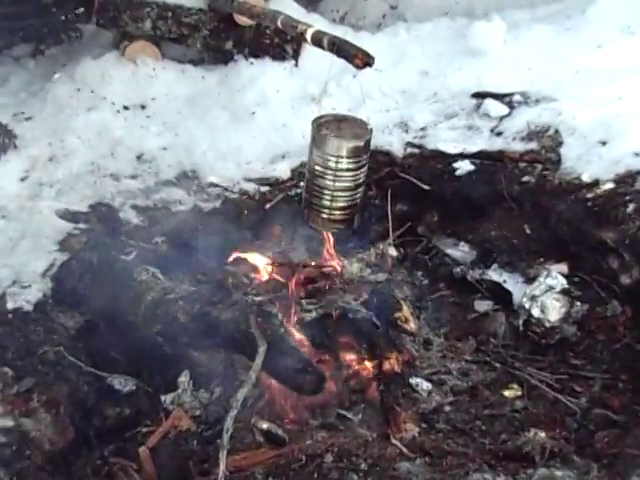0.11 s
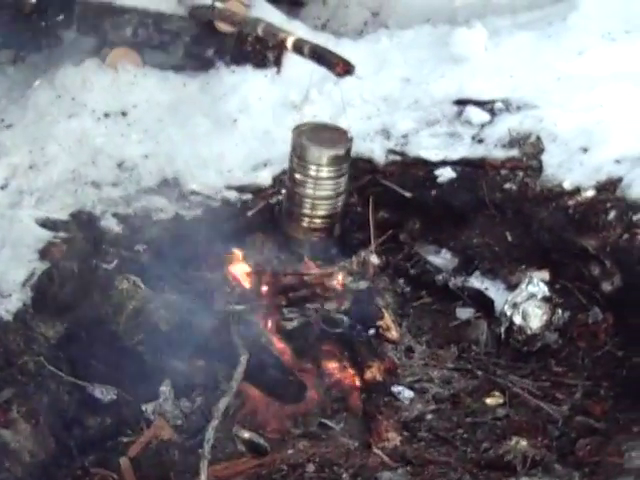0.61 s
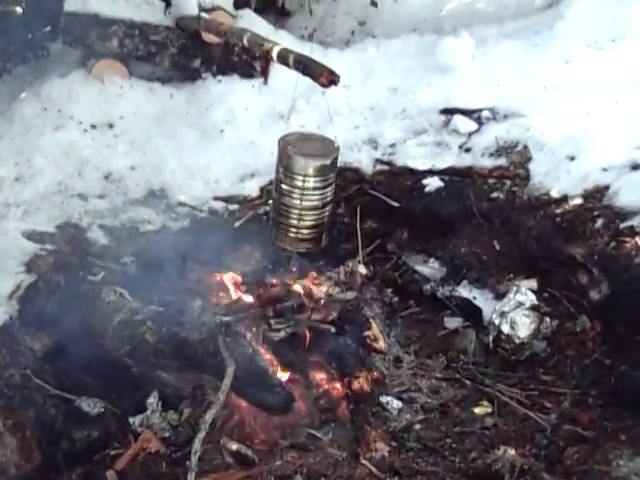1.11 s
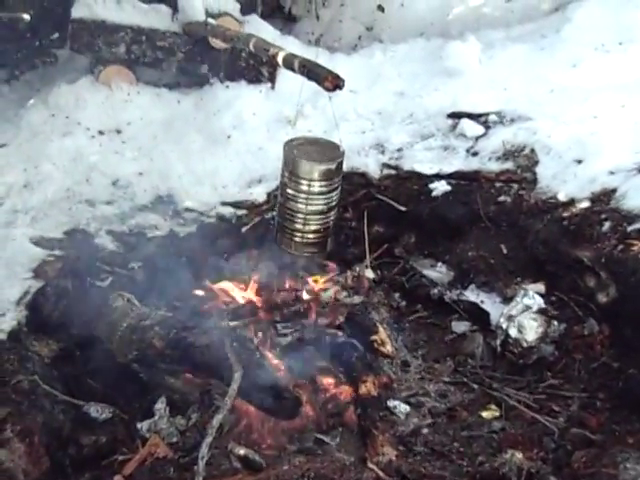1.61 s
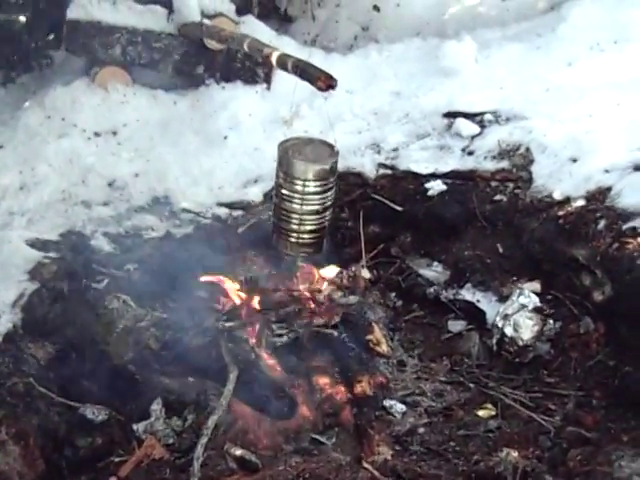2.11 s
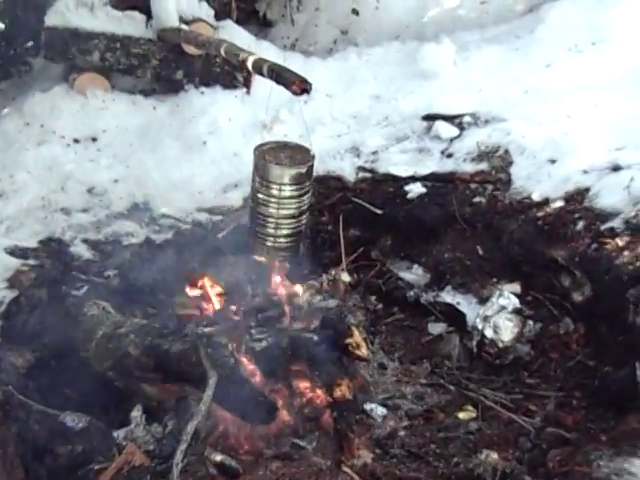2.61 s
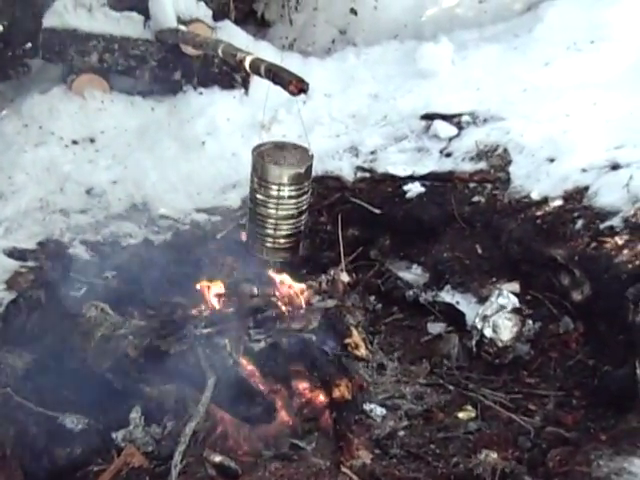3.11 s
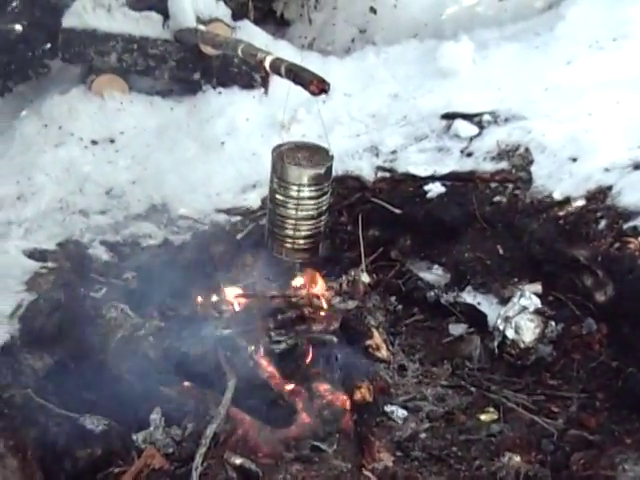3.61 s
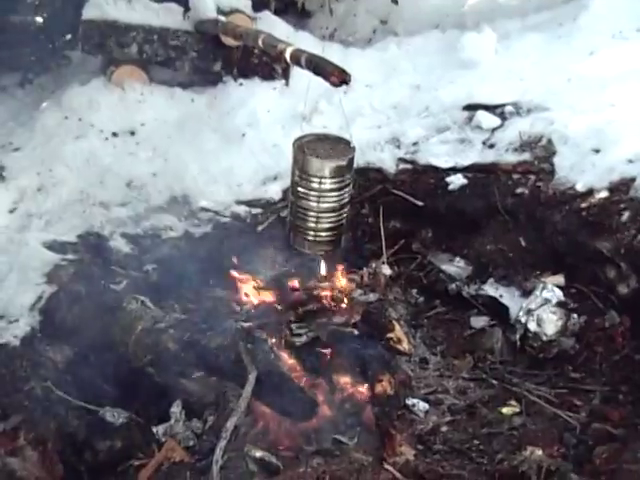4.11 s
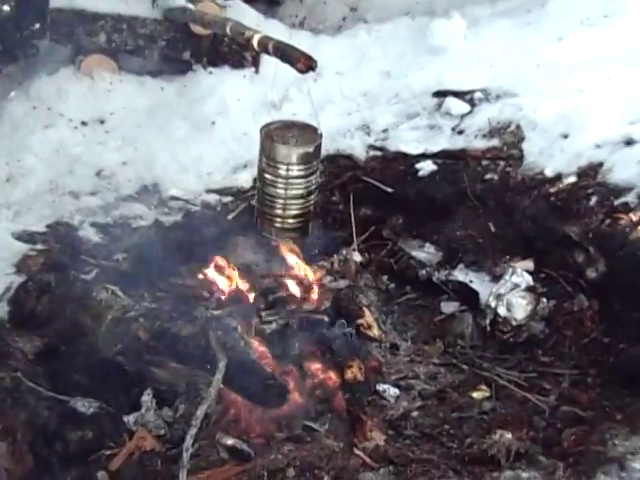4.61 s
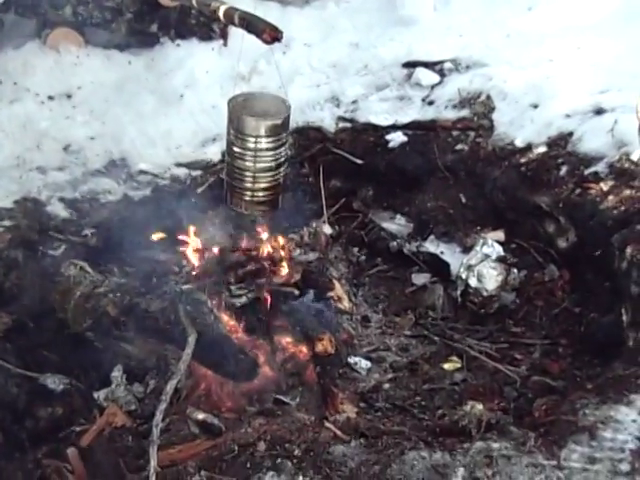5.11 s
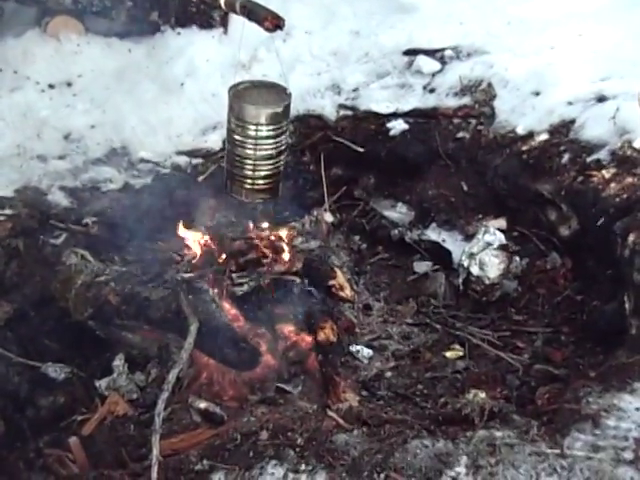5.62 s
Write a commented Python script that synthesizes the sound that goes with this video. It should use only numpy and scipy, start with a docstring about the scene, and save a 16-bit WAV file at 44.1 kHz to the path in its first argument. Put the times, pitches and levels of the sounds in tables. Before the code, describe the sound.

Close campfire crackle outdoors: dry bright snaps and clusters of pops with little steam hisses, above a quiet airy flame rustle.

```python
"""A small wood fire roars and hisses softly throughout, with sharp pops from the start, in the snow by a camera.
Pockets of sap burst as clusters of micro-cracks, each followed by a gritty spray of escaping steam.
Gas jets hiss, puffs and one low rustle swell and fade, gliding breathy tones whistle, bark snaps faintly.
The roar is coloured noise; the hand-held camera adds a faint hum, thin whines and short motor blips, all sines."""
import sys
import numpy as np
from scipy import signal
from scipy.io import wavfile

SR = 44100
rng = np.random.default_rng(int(sys.argv[2]) if len(sys.argv) > 2 else 0)


def dump_mix(stems):
    """Bounce the given channels to the path in sys.argv[1] as a 16-bit WAV at rate SR."""
    frames = np.atleast_2d(stems).T  # one column per channel
    limited = np.clip(frames, -1, 1)  # hard clip at full scale
    pcm = np.round(limited * 32767).astype(np.int16)
    wavfile.write(sys.argv[1], SR, pcm)


def level_to_linear(level):
    """Convert decibel levels to linear amplitude factors, elementwise."""
    exponent = np.asarray(level, float) / 20
    return 10 ** exponent


N = 252693  # samples in the scene

# All levels below are source levels, ahead of the trim and filters in record().
# Bursting sap pockets: start_s, low_db, mid_db, high_db, spray_db (steam)
POPS = [(.078, -61.5, -51, -21.5, -32.5), (0.085, -66, -54, -47, -50), (0.1005, -70, -66.5, -42.5, -46.5),
        (0.1275, -54, -47, -42, -60), (0.1342, -53, -43, -44.5, -46), (.1406, -65, -57.5, -41, -46),
        (0.1845, -35.5, -60, -36, -33), (.1903, -68, -46, -29.5, -54), (0.1971, -70, -34, -34.5, -55),
        (.291, -51.5, -43, -36.5, -46), (.3511, -42.5, -40, -31.5, -51), (0.3562, -24.5, -31.5, -14, -19.5),
        (.3611, -57, -20, -39.5, -45), (0.388, -40, -32.5, -51, -49), (.5802, -55, -63, -40.5, -60),
        (0.628, -29, -34.5, -27, -38), (.82, -39, -56, -33.5, -42.5), (0.9322, -58, -45.5, -31.5, -60),
        (.9729, -51, -70, -41, -60), (1.044, -46, -76.5, -42, -41), (1.102, -38.5, -35, -37, -39.5),
        (1.4481, -52, -38, -36.5, -60), (1.49, -61, -60, -39.5, -59), (1.5155, -39, -29.5, -36, -37),
        (1.8582, -45, -41, -54.5, -43), (1.8648, -46, -56, -31, -42), (1.8793, -47, -56.5, -39, -58),
        (1.9088, -53, -65, -43, -50), (1.9431, -37.5, -77, -50, -40), (1.9786, -65, -62, -36, -60),
        (2.1026, -44.5, -70, -38, -41.5), (2.211, -37.5, -47, -39, -37), (2.2233, -38, -38.5, -37, -40.5),
        (2.374, -47, -47, -60, -60), (2.6552, -41, -34.5, -29, -43.5), (2.8237, -51.5, -67, -38, -60),
        (2.8471, -51, -62, -46, -46), (3.0968, -49, -45, -44.5, -60), (3.2633, -17.5, -14, -4, -33),
        (3.349, -58, -67, -43, -60), (3.4458, -73, -39.5, -41.5, -40.5), (3.5198, -64, -40.5, -48, -60),
        (3.5759, -42.5, -62, -49, -43), (3.6118, -46, -53, -35.5, -58), (3.6579, -24.5, -7.5, -12.5, -19.5),
        (3.6684, -31, -33, -32, -50), (3.6827, -47, -44.5, -31, -50), (3.819, -70, -49, -41, -60),
        (3.883, -69, -38.5, -34, -40), (3.8903, -64.5, -63, -24.5, -32), (3.903, -64, -68, -39, -40),
        (3.9259, -66, -35, -21, -33.5), (3.973, -27.5, -62.5, -21.5, -27.5), (3.988, -66, -38, -45, -47),
        (3.9922, -60, -51.5, -32, -45), (4.0672, -43, -65.5, -39, -54), (4.0879, -53.5, -43, -36.5, -40.5),
        (4.287, -50.5, -73, -35.5, -60), (4.5061, -50.5, -64.5, -44, -60), (4.5653, -73, -72, -41.5, -43),
        (4.6294, -32.5, -32, -23.5, -31.5), (4.7418, -70, -71, -44, -58), (4.769, -62.5, -58, -43, -41),
        (4.7968, -50, -67, -49, -40), (4.8145, -38.5, -59, -41, -35), (4.8554, -70, -63, -41, -60),
        (4.9335, -45, -54, -36, -50), (4.9358, -73, -45, -29, -36), (5.0575, -66, -75.5, -35, -60),
        (5.1181, -55.5, -63, -35.5, -60), (5.1579, -39.5, -48.5, -25, -39), (5.1733, -43, -41, -41, -57.5),
        (5.215, -39.5, -43, -32, -39), (5.417, -34, -40, -27.5, -31.5), (5.4214, -36, -24, -17.5, -35),
        (5.5579, -36, -41, -54, -37), (5.6264, -29.5, -19, -18, -33), (5.653, -65, -47.5, -40, -60)]
# Bands of a pop, from low and mid to high and air: low_hz, high_hz
POP_BANDS = [(900, 2400), (2500, 5100), (6700, 11000), (11000, 15000)]
# Polarity of each band, so that neighbours join without a notch: sign
BAND_SIGNS = (1, -1, 1, -1)
# Strength of the fire, joined by straight lines: time_s, roar_db, jet_db
FIRE = [(0.0, -50.5, -51), (.48, -51, -55), (1.13, -50.5, -52), (1.37, -53.5, -50), (1.53, -53.5, -56.5),
        (1.85, -53, -55), (2.08, -49.5, -54), (2.86, -56, -56.5), (3.08, -53, -51), (3.27, -51, -45),
        (3.51, -53, -53), (3.69, -52.5, -51), (3.86, -56.5, -50), (3.97, -55, -43), (4.17, -53, -54.5),
        (4.72, -56.5, -53), (5.17, -55, -55), (5.73, -54, -53.5)]
# Relative colour of the flame roar: frequency_hz, density_db (per Hz)
ROAR_COLOUR = [(18, -31), (30, -13), (197, -0.5), (359, 0.5), (781, 2), (834, 2.5), (1240, -1),
               (1850, -2.5), (4030, -15.5), (6000, -62), (7800, -60), (13200, -120)]
# Relative colour of steam and gas: frequency_hz, density_db (per Hz)
JET_COLOUR = [(180, -20), (300, -13.5), (650, -3), (1150, -5.5), (2280, -2), (8580, -1.5), (12600, -4.5),
              (15400, -60.5), (16500, -53)]
# How alike left and right are: frequency_hz, likeness (0 to 1)
LIKENESS = [(60, 1), (240, 0.81), (950, 0.776), (3770, 0.75), (15000, 0.025)]
# Gas whistling out of cracks, and one faint short tone at 3.638 s, just before a pop:
# start_s, length_s, start_hz, middle_hz, end_hz, level_db, overtones_db (relative)
WHISTLES = [(2.532, 0.037, 900, 1017, 1030, -56.5, -2), (2.667, 0.054, 1310, 1300, 1240, -58.5, -25),
            (2.754, 0.048, 1167, 1110, 1010, -58.5, -1), (2.856, 0.091, 1253, 1690, 1790, -53.5, -25),
            (2.857, 0.0385, 2370, 2770, 3050, -47, -30), (2.944, 0.027, 1420, 1270, 990, -54.5, 8.5),
            (3.038, 0.059, 2440, 3140, 2760, -50, -30), (3.105, 0.034, 2690, 2472, 2310, -48.5, -30),
            (3.157, 0.0285, 908, 730, 548, -48, -25), (3.563, 0.02, 2610, 2610, 2580, -52, -30),
            (3.638, 0.021, 3050, 3075, 3050, -55.5, -30), (4.123, 0.0094, 3110, 2970, 3000, -44, -30)]
# Steps of the lens motor: start_s, level_db
BLIPS = [(0.005, -53.5), (0.122, -52), (0.206, -62), (0.239, -48), (0.681, -56.5), (0.773, -49.5),
         (1.342, -53), (1.541, -54.5), (1.573, -49), (1.772, -49), (2.612, -58.5), (2.981, -53.5),
         (3.007, -49), (5.274, -48.5), (5.346, -53), (5.381, -48.5), (5.442, -50), (5.485, -57),
         (5.611, -49), (5.646, -56), (5.72, -54)]
# Hum and whines of the camera: pitch_hz, width_hz, level_db, start_s, end_s
HUM = [(199, 9, -67.5, -1, 7), (840, 2, -68.5, -1, 7), (6659, 25, -72, 1.5, 3.05),
       (9076, 15, -68, 1.45, 3.05)]
# Puffs of gas, and one low rustle at 2.08 s: peak_s, half_length_s (to 1/e), level_db, low_hz, high_hz
PUFFS_AND_RUSTLE = [(.366, .008, -32.5, 246, 1100), (1.004, 0.035, -45, 2500, 12000),
                    (1.267, 0.06, -55, 3500, 12000), (2.076, 0.068, -54, 89, 550),
                    (2.404, 0.037, -50, 800, 3100), (2.552, 0.025, -52.5, 900, 3180),
                    (2.878, 0.034, -53.5, 2440, 3700), (3.16, .03, -40.5, 2500, 10800),
                    (4.038, 0.07, -43.5, 1490, 12000), (4.505, 0.055, -57, 4040, 11100),
                    (4.8, 0.031, -64, 1980, 11000)]


def rms_one(x):
    """Scale to rms 1."""
    return x / np.sqrt(np.mean(x ** 2) + 1e-20)


def band(x, low_hz, high_hz):
    """Band-pass with second-order Butterworth slopes."""
    return signal.sosfilt(signal.butter(2, [low_hz, high_hz], "band", fs=SR, output="sos"), x)


def low_pass(x, cut_hz):
    """Second-order Butterworth low-pass."""
    return signal.sosfilt(signal.butter(2, cut_hz, fs=SR, output="sos"), x)


def widen(mid, side):
    """Stereo pair: the side signal is added on the left and subtracted on the right."""
    return mid + side * [[1], [-1]]


def at_hz(points, hz):
    """Read a spectrum on a log-frequency axis."""
    points_hz, values = np.transpose(points)
    return np.interp(np.log(hz), np.log(points_hz), values)


def drift(rate_hz):
    """Random wander of rms about 1: two-pole filtered noise made at SR / 40, then interpolated."""
    r = np.exp(-2 * np.pi * rate_hz * 40 / SR)
    slow = signal.lfilter([1], [1, -2 * r, r * r], rng.standard_normal(N // 40 + 2002))
    slow = rms_one(slow[2000:])  # leave out the filter's start-up
    return np.interp(np.arange(N) / 40, np.arange(len(slow)), slow)


def grainy(shape, spread_db):
    """White noise whose samples have long-tailed sizes: dense crackle of rms 1."""
    size_db = spread_db * np.minimum(rng.exponential(1, shape[-1]), 6)
    return rms_one(rng.standard_normal(shape) * level_to_linear(size_db))


def coloured(white, spectrum, patchy_db):
    """Half-octave bands of stereo noise, each with its level, flicker and likeness; rms 1."""
    out = 0
    edges_hz = 25 * 2 ** np.arange(0, 9.6, .5)
    for k, (low_hz, high_hz) in enumerate(zip(edges_hz, edges_hz[1:])):
        mid, side = band(white[k % 2], low_hz, high_hz)  # neighbours draw on separate noise
        centre_hz = np.sqrt(low_hz * high_hz)
        alike = np.clip(at_hz(LIKENESS, centre_hz), 0, 1)
        gain = level_to_linear(at_hz(spectrum, centre_hz) + patchy_db * drift(3.6))
        out = out + gain * widen(np.sqrt(1 + alike) * mid, np.sqrt(1 - alike) * side)
    return rms_one(out)


def camera_hum():
    """Thin lines: sines whose phase walks at random, which spreads each to its width."""
    out, t = np.zeros(N), np.arange(N) / SR
    for hz, width_hz, level_db, start_s, end_s in HUM:
        fade = np.clip(np.minimum(t - start_s, end_s - t) / 0.1, 0, 1)
        wander = np.cumsum(rng.standard_normal(N)) * np.sqrt(2 * np.pi * width_hz / SR)
        out += fade * level_to_linear(level_db) * np.sqrt(2) * np.sin(2 * np.pi * hz * t + wander)
    return out


def motor_blips(pitch_hz=1890, length_s=.011, edge_s=0.00059):
    """Each step of the lens motor sounds as a short flat tone burst."""
    t, gate = np.arange(N) / SR, np.zeros(N)
    for start_s, level_db in BLIPS:
        inside_s = np.minimum(t - start_s, start_s + length_s - t)
        gate += level_to_linear(level_db) * np.clip(inside_s / edge_s, 0, 1)
    return np.sqrt(2) * gate * np.sin(2 * np.pi * pitch_hz * t)


def fire_level(column):
    """Gain of one column of FIRE over time, moving in straight lines of dB."""
    points = np.transpose(FIRE)
    return level_to_linear(np.interp(np.arange(N) / SR, points[0], points[column]))


def flame_roar():
    """Turbulent flames: smooth coloured noise with a slow flicker in each band."""
    return fire_level(1) * coloured(rng.standard_normal((2, 2, N)), ROAR_COLOUR, patchy_db=2.0)


def gas_jets():
    """Gas hisses out of the wood: grainy noise in the jet colour."""
    return fire_level(2) * coloured(grainy((2, 2, N), 2.2), JET_COLOUR, patchy_db=1.06)


def small_crackle(level_db=-44, per_s=14, spread_db=12):
    """Tiny random snaps of bark: bright grainy noise bursts dying at a 0.5 ms time constant."""
    sizes = level_to_linear(spread_db * np.minimum(rng.exponential(1, N), 2))
    born = (rng.random(N) < per_s / SR) * sizes
    fall = signal.lfilter([1], [1, -np.exp(-1 / (.0005 * SR))], born)
    return level_to_linear(level_db) * band(fall * grainy((N,), 3.0), 6000, 13500)


def puffs_and_rustle(unlike=0.244):
    """Puffs of gas, and one low rustle: each is a bell-shaped swell of slightly grainy noise."""
    out, t = np.zeros((2, N)), np.arange(N) / SR
    for peak_s, half_s, level_db, low_hz, high_hz in PUFFS_AND_RUSTLE:
        at = slice(round((peak_s - 3 * half_s) * SR), round((peak_s + 3 * half_s) * SR))
        mid, side = band(grainy((2, len(t[at])), 0.72), low_hz, high_hz)
        swell = level_to_linear(level_db) * np.exp(-((t[at] - peak_s) / half_s) ** 2)
        out[:, at] += swell * rms_one(widen(mid, unlike * side))
    return out


def whistles(edge_s=0.008, steady=1.0, shake=0.506, top_hz=3100, waver=0.036):
    """Tones with two overtones glide along a parabola; level and pitch shake fast, as in turbulence."""
    out, t, bend = np.zeros(N), np.arange(N) / SR, drift(150)
    for start_s, length_s, *arch_hz, level_db, overtones_db in WHISTLES:
        at = slice(round((start_s - edge_s) * SR), round((start_s + length_s + edge_s) * SR))
        u = (t[at] - start_s) / length_s  # 0 to 1 along the glide
        parabola = np.polyfit([0, .5, 1], arch_hz, 2)
        hz = np.polyval(parabola, np.clip(u, 0, 1))
        gate = np.clip(np.minimum(u, 1 - u) * length_s / edge_s + .5, 0, 1)
        phase = 2 * np.pi * np.cumsum(hz * (1 + waver * bend[at])) / SR
        tone = level_to_linear(level_db) * np.sin(phase)
        tone += level_to_linear(level_db + overtones_db) * np.sin(2 * phase)
        tone += level_to_linear(level_db + overtones_db - 7.5) * np.sin(3 * phase)
        out[at] += gate * tone
    out = low_pass(out + 1e-18, top_hz)  # the tiny offset keeps the filter off denormals
    return np.sqrt(2) * out * (steady + shake * drift(200))


def spray(follow=0.39, dull_db=-3, top_hz=11500):
    """After each pop gritty steam rushes from the opened pocket, partly in the pop's colour, and dies away."""
    power, t = np.zeros((3, N)), np.arange(N) / SR
    for start_s, *colour_db, spray_db in POPS:
        # a stronger spray empties a bigger pocket: 12.5 dB more doubles its 60 dB decay time
        t60_s = 0.048 * 2 ** ((spray_db + 41.5) / 12.5)
        at = slice(round(start_s * SR), round((start_s + t60_s) * SR))
        since_s = np.maximum(t[at] - start_s, 0)
        rush = level_to_linear(spray_db - 60 * since_s / t60_s) * (1 - np.exp(-since_s / .0015))
        tint = level_to_linear(follow * (np.array(colour_db) - max(colour_db)) + [dull_db, 0, 0])
        power[:, at] += np.outer(tint, rush) ** 2  # overlapping sprays add in power
    grit = coloured(grainy((2, 2, N), 3.0), JET_COLOUR, patchy_db=2.0)
    out, split_hz = np.zeros((2, N)), ((450, 2500), (2500, 6000), (6000, top_hz))
    for band_power, edges_hz, sign in zip(power, split_hz, BAND_SIGNS):
        out += sign * np.sqrt(band_power) * rms_one(band(grit, *edges_hz))
    return out


def pops(trail_db=-24, cut_hz=16000, air_db=-44, air_follows=0.87):
    """The wood tears in a fast-dying cluster of micro-cracks; weaker ones trail. Big pockets have less air."""
    size = 1200
    out, t = np.zeros((2, N + size)), np.arange(size) / SR
    fall = np.exp(-t / .0007) + level_to_linear(trail_db) * np.exp(-t / .004)
    for start_s, low_db, mid_db, high_db, _ in POPS:
        shared, own = grainy((2, size), 3.0) * fall
        shared[0] = -4.6  # the first crack leads
        at = round(start_s * SR) - 4
        # the top band rises less than the band below it
        levels_db = (low_db, mid_db, high_db, air_db + air_follows * (high_db + 26.5))
        for (low_hz, high_hz), level_db, sign in zip(POP_BANDS, levels_db, BAND_SIGNS):
            mid, side = band(np.array([shared, own]), low_hz, high_hz)
            scale = sign * level_to_linear(level_db) / np.sqrt(np.mean(mid[:130] ** 2))  # level over 3 ms
            out[:, at:at + size] += scale * widen(mid, high_hz / 50000 * side)  # treble is wider
    return low_pass(out[:, :N], cut_hz)


def scene():
    """Camera and fire bed behind, crackle, puffs, rustle and whistles between, steam and pops in front."""
    background = camera_hum() + motor_blips() + flame_roar() + gas_jets()
    details = small_crackle() + puffs_and_rustle() + whistles()
    return background + details + spray() + pops()


def top_cut(x):
    """Nothing passes above the cut-off."""
    return signal.sosfilt(signal.butter(12, 16710, fs=SR, output="sos"), x)


def record(dry, turn_hz=12500, width_hz=5000, rumble_hz=45, trim_db=-4.0):
    """The left capsule turns the phase of the treble (all-pass); the bass is cut and peaks overload."""
    r, w = np.exp(-np.pi * width_hz / SR), 2 * np.pi * turn_hz / SR
    poles = [1, -2 * r * np.cos(w), r * r]
    left = signal.lfilter(poles[::-1], poles, dry[0])
    stereo = np.array([left, dry[1]]) * level_to_linear(trim_db)
    rumble_cut = signal.butter(2, rumble_hz, "high", fs=SR, output="sos")
    mix = np.clip(signal.sosfilt(rumble_cut, stereo), -1, 1)
    return top_cut(mix)


dry = scene()
out = record(dry)
dump_mix(out)
```